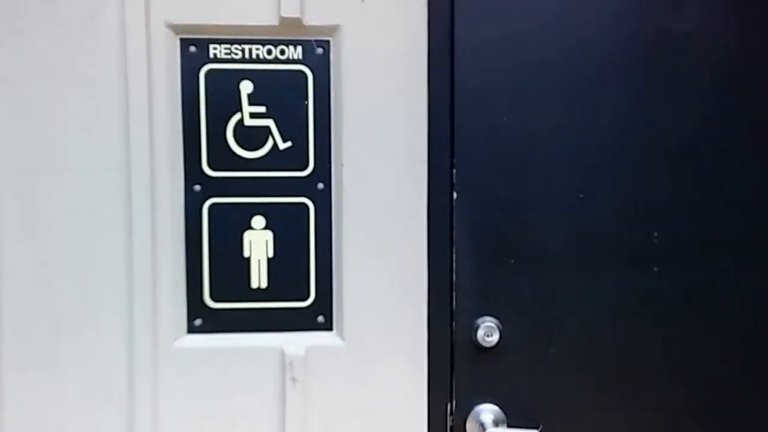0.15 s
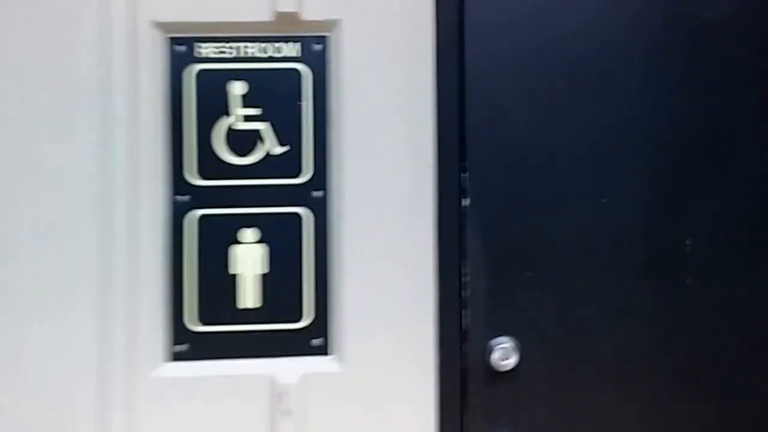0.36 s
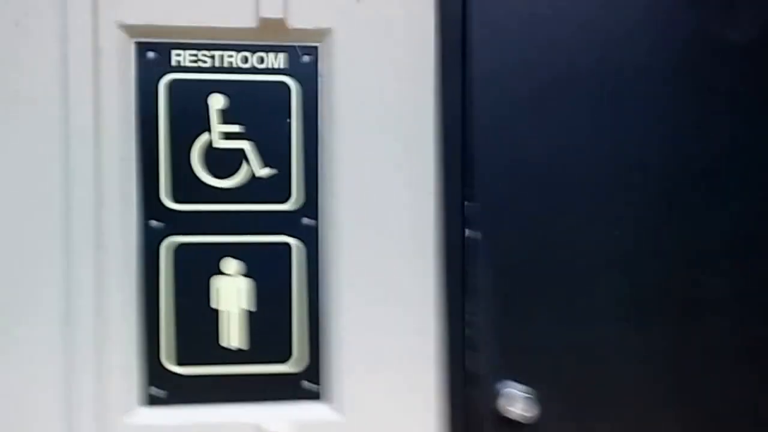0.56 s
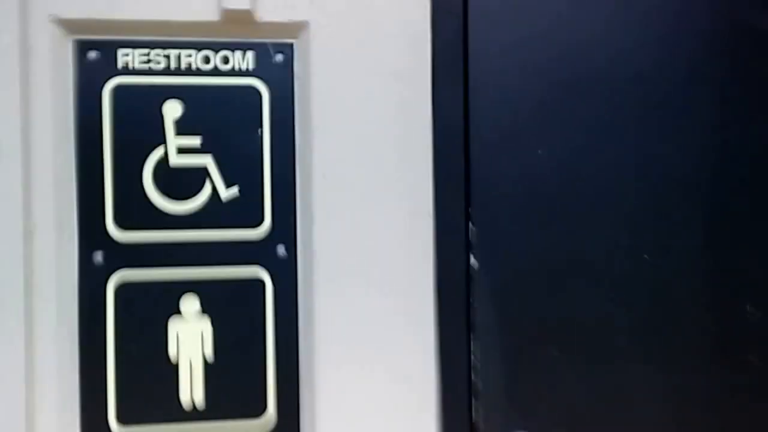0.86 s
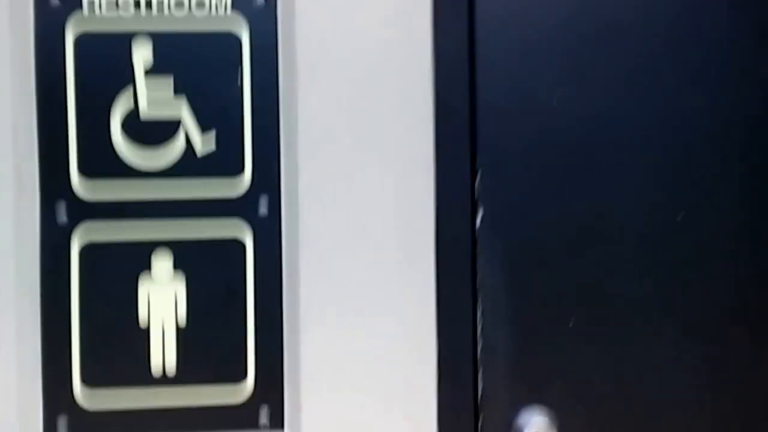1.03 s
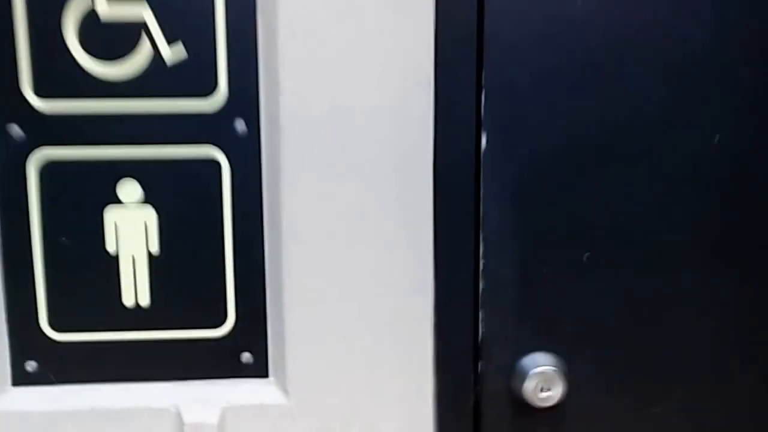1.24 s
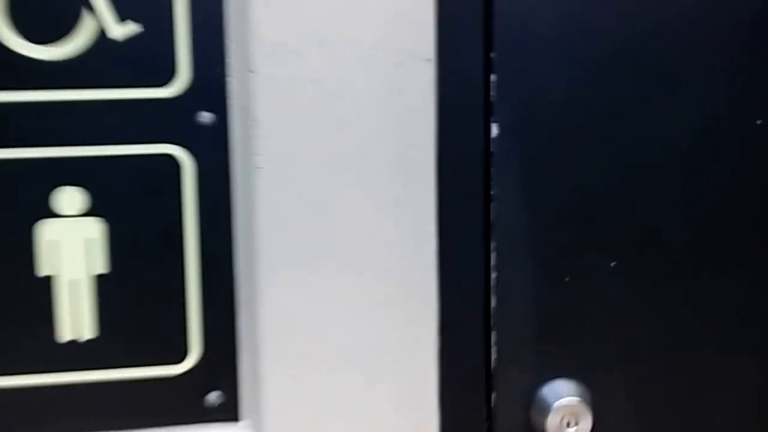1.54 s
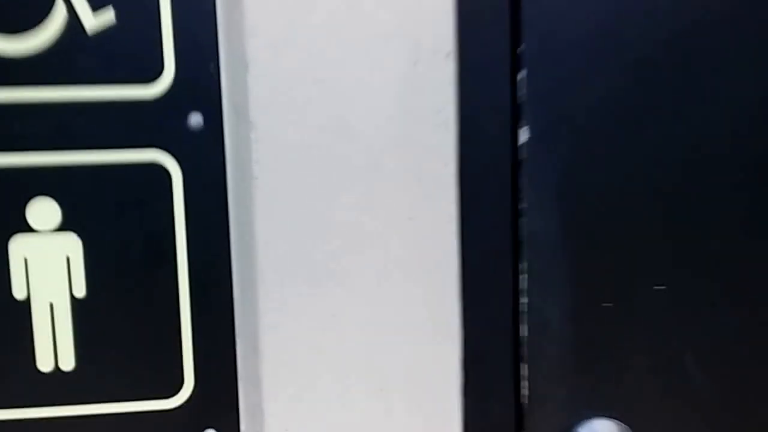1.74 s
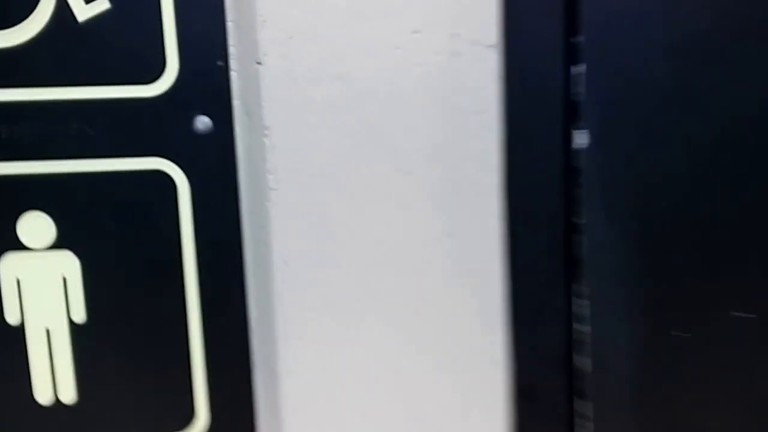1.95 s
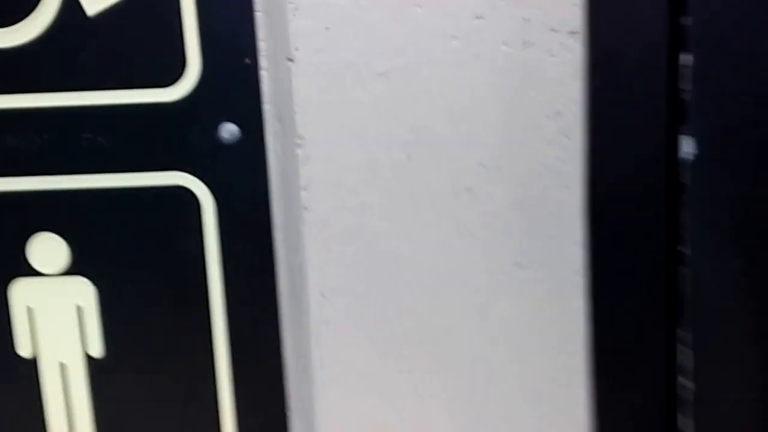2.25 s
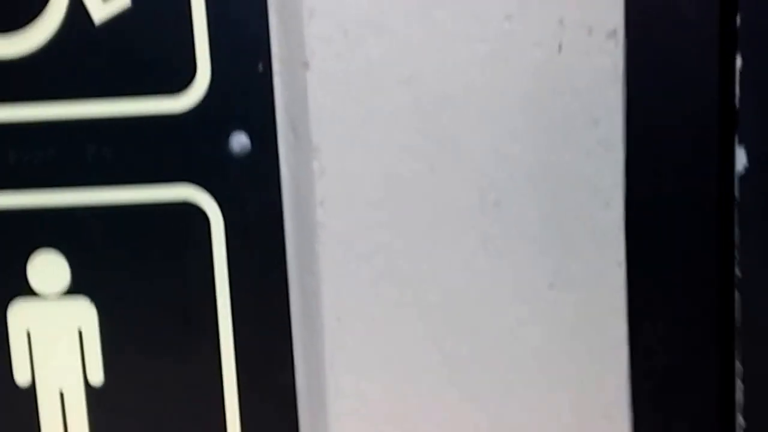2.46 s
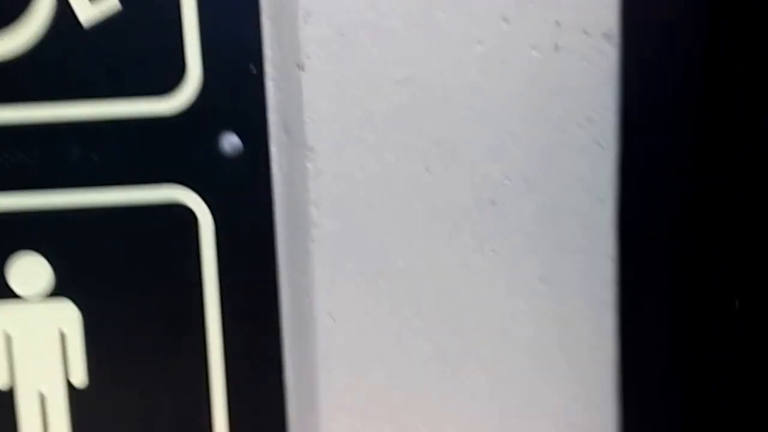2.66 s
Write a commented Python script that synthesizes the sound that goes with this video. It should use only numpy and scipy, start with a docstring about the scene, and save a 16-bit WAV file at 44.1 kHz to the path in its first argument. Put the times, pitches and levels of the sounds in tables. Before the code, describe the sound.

A door latch snaps hard near the end, close to the microphone, with a metallic ring and low door boom; before it, soft scuffs, small ticks and rubbing over a low wavering motor hum in a hard-walled passage.

```python
"""A motor drone and a soft scuff come first; someone walks up to a steel door in a concrete passage.
The drone is a stack of partials that swell and fade as the listener moves among the walls.
Soles and cloth scuff as grainy hiss, the lever's works rub as narrow noise, small parts tick as short rings.
Then the lock snaps: a burst of clicks rings the bolt, lever and steel skin, and the door leaf booms.
Air noise, rumble and low thuds lie beneath, and the walls add a diffuse tail to hand and latch."""
import sys
import numpy as np
from scipy import signal
from scipy.fft import rfft, irfft
from scipy.io import wavfile

SR = 44100
rng = np.random.default_rng(int(sys.argv[2]) if len(sys.argv) > 2 else 0)


def ratio_of_db(decibels):
    """Turn decibels (scalar or array-like) into linear amplitude factors; 0 dB maps to 1."""
    return 10 ** (np.asarray(decibels, float) / 20)


def log_audio(samples):
    """Write samples as a 16-bit WAV file to the path given in sys.argv[1]."""
    # one column per channel
    frames = np.atleast_2d(samples).T
    # limit to full scale, then quantise
    limited = np.clip(frames, -1, 1)
    pcm = np.round(limited * 32767).astype(np.int16)
    wavfile.write(sys.argv[1], SR, pcm)


N = 123479   # length in samples


def rms_one(x):
    """Scales a signal to rms 1."""
    return x / np.sqrt(np.mean(x ** 2) + 1e-20)


def in_time(rows):
    """Joins the rows of a timed table by straight lines, one curve per column after the time."""
    start_s, *columns = np.transpose(rows)
    return [np.interp(np.arange(N) / SR, start_s, column) for column in columns]


def at_hz(points, hz):
    """Reads a (frequency, value) curve on a logarithmic frequency axis."""
    points = np.array(points)
    return np.interp(np.log(hz), np.log(points[:, 0]), points[:, 1])


def drift(rate_hz):
    """Random wander of rms 1: noise through two equal poles at rate_hz, made at SR / 40."""
    r = np.exp(-80 * np.pi * rate_hz / SR)
    noise = rng.standard_normal(N // 40 + 2002)
    slow = signal.lfilter([1], [1, -2 * r, r * r], noise)[2000:]   # skip the filter's start
    return np.interp(np.arange(N) / 40, np.arange(len(slow)), rms_one(slow))


def band(x, low_hz, high_hz):
    """Band-passes a signal."""
    return signal.sosfilt(signal.butter(2, [low_hz, high_hz], "band", fs=SR, output="sos"), x)


# Third-octave band edges [Hz]
EDGES_HZ = 28 * 2 ** np.arange(0, 9.4, 1 / 3)


def bands(size, spectrum):
    """Third-octave bands of noise of a given spectrum, with their centres; neighbours are independent."""
    padded = size + 4000   # the extra start lets the band filters settle
    white = rng.standard_normal((2, padded))
    gain = ratio_of_db(at_hz(spectrum, np.fft.rfftfreq(padded, 1 / SR) + 1))
    shaped = irfft(rfft(white) * gain, padded)
    out = []
    for k, (low_hz, high_hz) in enumerate(zip(EDGES_HZ, EDGES_HZ[1:])):
        out.append((np.sqrt(low_hz * high_hz), band(shaped[k % 2], low_hz, high_hz)[4000:]))
    return out


def coloured(spectrum, flicker_db):
    """Noise of a given spectrum whose bands flicker independently; rms 1."""
    low_hz, high_hz = spectrum[0][0], spectrum[-1][0]
    return rms_one(sum(ratio_of_db(flicker_db * drift(8.3)) * noise
                       for hz, noise in bands(N, spectrum) if low_hz < hz < high_hz))


def dying(spectrum, t60_curve, rise_s):
    """Half a second of noise that swells in, then dies band by band; energy 1."""
    t = np.arange(SR // 2) / SR
    tail = sum(noise * ratio_of_db(-60 * t / at_hz(t60_curve, hz)) for hz, noise in bands(len(t), spectrum))
    tail = tail * np.clip(t / rise_s, 0, 1)
    return tail / np.sqrt(np.sum(tail ** 2))


def whistle(hz, width_hz):
    """Noise twice through one resonance, each pass width_hz wide; rms 1."""
    r = np.exp(-np.pi * width_hz / SR)
    poles = [1, -2 * r * np.cos(2 * np.pi * hz / SR), r * r]
    once = signal.lfilter([1, 0, -1], poles, rng.standard_normal(N))
    return rms_one(signal.lfilter([1, 0, -1], poles, once))


def ring(clicks, modes):
    """Clicks set decaying sines ringing, signs alternating from mode to mode."""
    out = 0
    for k, (hz, db, t60_s) in enumerate(modes):
        r, w = ratio_of_db(-60 / (t60_s * SR)), 2 * np.pi * hz / SR
        strike = (-1) ** k * ratio_of_db(db) * np.sin(w)
        out = out + signal.lfilter([0, strike], [1, -2 * r * np.cos(w), r * r], clicks + 1e-18)
    return out


def stroke(start_s, length_s):
    """Quick rise, slightly sagging hold, exponential release; longer strokes swell and fade more slowly."""
    t = np.arange(N) / SR - start_s
    rise = np.clip(t / (0.0014 + 0.1 * length_s), 0, 1)
    release = np.maximum(t - length_s, 0) / (0.016 + 0.19 * length_s)
    sag = 0.054 * np.clip(t / length_s, 0, 1)
    return rise * np.exp(-release - sag)


# Touches of the bolt: after_s [s after the snap starts], level_db [dB relative to the snap]
LATCH_TOUCHES = [(0, -37), (.0006, 2), (.0012, 0), (.0018, -3.5), (.0045, -6), (0.0122, -7.5)]


def latch_clicks():
    """The bolt strikes and bounces: one single-sample click per touch."""
    snap_s, snap_db = 2.5331, -6.5
    clicks = np.zeros(N)
    for after_s, level_db in LATCH_TOUCHES:
        clicks[int((snap_s + after_s) * SR)] = ratio_of_db(snap_db + level_db)
    return clicks


# Ringing modes of the bolt: pitch_hz [Hz], level_db [dB, relative], t60_s [s]
BOLT_MODES = [(1416, -26.5, 0.046), (2860, -5.5, 0.017), (4970, 1.5, 0.0043), (6190, -4, 0.012),
              (7360, -15, 0.021), (9600, -18, 0.003)]
# Ringing modes of the lever: pitch_hz [Hz], level_db [dB, relative], t60_s [s]
LEVER_MODES = [(709, 17, 0.049), (1207, 6.5, 0.05), (1442, -18, 0.24), (2547, 5, 0.078), (2907, 2.5, 0.25),
               (4840, -6, 0.1), (5400, -8, 0.2)]
# Where the lock radiates little: pitch_hz [Hz], width_hz [Hz]
LOCK_DIPS = [(3500, 310), (4380, 440)]


def lock(clicks):
    """Bolt and lever ring from the same clicks; notches thin out what the lock radiates little of."""
    metal = ring(clicks, BOLT_MODES) + ratio_of_db(-31) * ring(clicks, LEVER_MODES)
    for hz, width_hz in LOCK_DIPS:
        metal = signal.lfilter(*signal.iirnotch(hz, hz / width_hz, fs=SR), metal)
    return metal


# Hiss spectrum of the steel skin: pitch_hz [Hz], level_db [dB per Hz, relative]
SKIN_SPECTRUM = [(700, -27), (1150, -3), (1500, -9), (1900, -10), (2400, 0), (2900, 0), (3500, -14),
                 (3950, 0), (4400, -8), (4950, -3), (5400, 3), (7200, -6), (10500, -11.5), (15600, -36)]
# Decay of that hiss: pitch_hz [Hz], t60_s [s]
SKIN_DECAY = [(800, 0.22), (2900, 0.26), (5300, 0.16), (8000, 0.12), (11000, 0.066)]


def skin(clicks):
    """The steel skin's countless modes blur into a dying hiss, set off by the strongest click."""
    strongest = clicks * (clicks == clicks.max())
    hiss = dying([(100, -90), *SKIN_SPECTRUM], SKIN_DECAY, rise_s=0.00154)
    return ratio_of_db(6) * signal.fftconvolve(strongest, hiss)[:N]


# Booming modes of the door leaf: pitch_hz [Hz], level_db [dB, relative], t60_s [s]
LEAF_MODES = [(64, -24, 0.39), (115.3, -7, 0.43), (193, -11, 0.27), (219.4, -9, 0.62), (277, 0, 0.069),
              (312.8, 0.5, 0.22), (373.3, -3, 0.21), (412, 0.5, 0.41), (473, 7, 0.36)]


def leaf(clicks):
    """The leaf's low modes boom from two softened pushes."""
    second_push_s, soft_hz = 0.01171, 900
    push = clicks + 0.94 * np.roll(clicks, int(second_push_s * SR))
    soft = np.exp(-2 * np.pi * soft_hz / SR)
    softened = signal.lfilter([(1 - soft) ** 2], [1, -2 * soft, soft ** 2], push)
    return ratio_of_db(-23) * ring(softened, LEAF_MODES)


def latch():
    """The bolt snaps and bounces; lever, skin and door leaf ring on."""
    clicks = latch_clicks()
    metal = band(lock(clicks) + skin(clicks), 930, 17000)
    contact_top_hz = 11100   # softens the contact's extreme treble
    metal = signal.sosfilt(signal.butter(2, contact_top_hz, fs=SR, output="sos"), metal)
    return metal + leaf(clicks)


# Scuffs of soles and cloth: start_s [s], length_s [s],
# top_db [dB of the hiss before grain and stroke], body_db [dB of the lower body, likewise]
SCUFFS = [(.0, 0.062, -73.5, -68), (0.227, 0.1, -75, -84), (0.406, 0.0072, -60, -74),
          (0.446, .06, -75.5, -88), (0.941, 0.06, -59.5, -60), (1.0915, 0.018, -60, -58),
          (1.751, 0.008, -62, -61), (2.007, .026, -54, -54), (1.138, 0.14, -77, -65.5),
          (1.536, 0.024, -69, -59.5), (2.065, 0.073, -65.5, -58.5), (2.161, 0.24, -70, -72),
          (2.355, 0.057, -68, -60.5), (2.452, 0.027, -65.5, -53), (2.493, 0.11, -64, -56.5),
          (2.68, 0.099, -66, -61)]
# Scuff hiss: pitch_hz [Hz], level_db [dB per Hz, relative]
SCUFF_TOP = [(4600, -24), (5600, -5), (6500, 2.5), (7800, -3.5), (10000, -12.5), (12000, -18)]
# Lower body of the scuffs: pitch_hz [Hz], level_db [dB per Hz, relative]
SCUFF_BODY = [(400, -22), (700, 6.5), (1100, -1.5), (2300, 0.5), (3100, -2.5), (4000, -8.5), (4700, -30)]


def scuffs(grain):
    """Friction of soles and cloth: grainy hiss and a lower body under each stroke."""
    top = coloured(SCUFF_TOP, flicker_db=1.5)
    body = coloured(SCUFF_BODY, flicker_db=4.5)
    return grain * sum(stroke(start_s, length_s) * (ratio_of_db(top_db) * top + ratio_of_db(body_db) * body)
                       for start_s, length_s, top_db, body_db in SCUFFS)


# Rubbed small parts: start_s [s], length_s [s], pitch_hz [Hz], width_hz [Hz, of one pass],
# level_db [dB before grain and stroke]
RUBS = [(0.99, 0.024, 1750, 140, -54), (0.96, 0.033, 2720, 820, -59.5), (1.21, 0.071, 1446, 180, -55),
        (1.26, 0.13, 1440, 160, -65.5), (1.5, 0.16, 420, 110, -59), (1.811, 0.34, 302, 60.5, -53.5),
        (2.073, 0.11, 2290, 300, -58), (2.075, 0.052, 1320, 270, -56), (2.09, 0.082, 660, 220, -51.5),
        (2.624, 0.082, 373, 180, -47.5)]


def rubs(grain):
    """Rubbing keeps a small part sounding: grainy noise in one resonance under each stroke."""
    return grain * sum(ratio_of_db(level_db) * stroke(start_s, length_s) * whistle(hz, width_hz)
                       for start_s, length_s, hz, width_hz, level_db in RUBS)


# Tapped small parts: start_s [s], pitch_hz [Hz], level_db [dB before the band-pass], t60_s [s]
TICKS = [(.406, 880, -45.5, 0.051), (1.0955, 2250, -36, 0.025), (1.103, 4004, -42.5, 0.034),
         (1.54, 1018, -40, 0.05), (1.752, 728, -37, 0.043), (2.009, 2246, -42, 0.21),
         (2.022, 1710, -41.5, 0.061), (2.022, 299, -32, 0.12), (2.036, 509, -35, 0.073),
         (2.105, 2300, -39.5, 0.051), (2.19, 353, -33, 0.083), (2.405, 2145, -48, 0.057),
         (2.461, 1340, -39.5, 0.056), (2.479, 2625, -40.5, 0.077)]


def ticks():
    """Each tapped part rings once as a single decaying sine."""
    taps = sum(ring(1. * (np.arange(N) == int(start_s * SR)), [mode]) for start_s, *mode in TICKS)
    return band(taps, 276, 3900)


# Crisp contacts of small metal parts: start_s [s], level_db [dB of the click that excites them]
CLICKS = [(.41, -57), (1.0927, -48), (1.096, -47), (1.1118, -49), (2.405, -63), (2.361, -54.5),
          (2.479, -43)]
# Modes those contacts share: pitch_hz [Hz], level_db [dB, relative], t60_s [s]
SMALL_PART_MODES = [(2280, 1.5, 0.035), (3950, -8.5, 0.045), (5880, -3, 0.011), (6990, -3, 0.02)]


def small_contacts():
    """Single-sample contacts ring one shared set of short metal modes."""
    contacts = sum(ratio_of_db(level_db) * (np.arange(N) == int(start_s * SR)) for start_s, level_db in CLICKS)
    return band(ring(contacts, SMALL_PART_MODES), 1200, 8500)


def handling():
    """Feet and hand at work: scuffs and rubs share one fast grain, ticks and contacts ring cleanly."""
    grain = ratio_of_db(3 * drift(185))
    return scuffs(grain) + rubs(grain) + ticks() + small_contacts()


# Middle partials along the walk: start_s [s], level_db [dB rms] of multiples 4, 5, 6, 7, 8, 9
DRONE_MIDDLE = [(0, -60, -51, -47.5, -99, -70, -54.5), (.3, -74, -45, -45, -69, -60, -52),
                (.72, -73, -51, -42, -62, -62, -63.5), (.9, -75, -56, -44, -60, -61, -64.5),
                (1.25, -74, -56.5, -51, -78.5, -56.5, -53.5), (1.6, -71, -59, -59, -82, -66, -60.5),
                (2.1, -62, -57.5, -74, -85, -99, -80), (2.3, -68, -48.5, -54, -79, -84, -76)]
# Low partials along the walk: start_s [s], level_db [dB rms] of multiples 2, 3
DRONE_LOW = [(0, -72, -87), (.9, -69, -78), (2.8, -64, -55)]
# High partials, multiples 10-14: level_db [dB rms, before their wander]
DRONE_HIGH_DB = [-72, -71.5, -73, -76, -68.5]


def motor(turn):
    """Partials of the turning rate swell and fade; those far from multiples 5 and 6 are out of step."""
    levels = [*enumerate(in_time(DRONE_MIDDLE), 4), *enumerate(in_time(DRONE_LOW), 2)]
    levels += [(k, level_db + 4 * drift(2.5)) for k, level_db in enumerate(DRONE_HIGH_DB, 10)]
    spread = 0.197   # radians per multiple squared
    return sum(np.sqrt(2) * ratio_of_db(level_db) * np.cos(k * turn + spread * (k - 5) * (k - 6))
               for k, level_db in levels)


# Background levels: start_s [s], rumble_db [dB, before its wander],
# duct_db [dB, heard only as departure from its mean]
BACKGROUND_LEVELS = [(0.0, -55, -56.5), (0.27, -65, -60), (1.51, -58, -61), (1.6, -60.5, -65),
                     (2.06, -51.5, -63.5), (2.42, -53, -58.5), (2.52, -52, -72), (2.8, -59, -63)]
# Duct resonances: pitch_hz [Hz], width_hz [Hz, of one pass], level_db [dB before swell and throb]
DUCT_PEAKS = [(726, 95, -66), (880, 55, -68), (982, 47, -69), (1459, 68, -74), (2304, 560, -75)]


def duct(turn):
    """Noise in the duct's resonances swells along the walk and throbs with each motor turn."""
    duct_db = in_time(BACKGROUND_LEVELS)[1]
    noise = sum(ratio_of_db(level_db) * whistle(hz, width_hz) for hz, width_hz, level_db in DUCT_PEAKS)
    return noise * ratio_of_db(duct_db - duct_db.mean()) * (1 + 0.2 * np.cos(turn))


def drone():
    """Motor partials and duct noise follow the same turning angle."""
    turn_hz, beat_s = 23.31, 0.017   # turning rate; instant of one beat
    turn = 2 * np.pi * turn_hz * (np.arange(N) / SR - beat_s)
    return motor(turn) + duct(turn)


# Door shifts under the hand: start_s [s], length_s [s], level_db [dB before the stroke]
THUDS = [(2.24, 0.11, -49), (2.37, 0.054, -57), (2.554, 0.052, -38), (2.683, 0.22, -53)]


def thuds():
    """The door shifts under the hand: strokes of deep noise."""
    return rms_one(band(rng.standard_normal(N), 54, 113)) * sum(
        ratio_of_db(level_db) * stroke(start_s, length_s) for start_s, length_s, level_db in THUDS)


# Air noise: pitch_hz [Hz], level_db [dB per Hz, relative]
AIR_SPECTRUM = [(24, -37), (40, -4), (58, -20), (92, -2.5), (127, -0.5), (181, -3.5), (316, -19),
                (427, -18), (981, -12.5), (1230, -17), (1470, -17), (11900, -41.5), (14900, -43),
                (16500, -60)]


def background():
    """Near-steady air noise, a wandering rumble that is strongest near the door, and low thuds."""
    air = ratio_of_db(-56.5) * coloured(AIR_SPECTRUM, flicker_db=0.5)
    rumble_db = in_time(BACKGROUND_LEVELS)[0] + 2.0 * drift(13.5)
    rumble = rms_one(band(rng.standard_normal(N), 274, 511)) * ratio_of_db(rumble_db)
    return air + rumble + thuds()


# Decay of the passage: pitch_hz [Hz], t60_s [s]
PASSAGE_DECAY = [(100, 0.55), (300, 0.59), (1000, 0.87), (3000, 0.63), (5500, 0.44), (7500, 0.45),
                 (11000, 0.52)]


def passage(x):
    """Diffuse tail of the concrete walls: the sound convolved with dying noise."""
    tail = dying([(100, 0.009), (10000, 0)], PASSAGE_DECAY, rise_s=0.0027)
    return ratio_of_db(-9.5) * signal.fftconvolve(x, tail)[:N]


def scene():
    """Mixes all sources; the latch is close, so the walls add less to it."""
    hand, snap = handling(), latch()
    walls = passage(hand + ratio_of_db(-5) * snap)
    return (hand + snap + walls + drone() + background())[None]


def band_limit(x):
    """A steep low-pass at the top of the band."""
    return signal.sosfilt(signal.butter(12, 16930, fs=SR, output="sos"), x)


def record(dry):
    """The microphone drops the deepest bass and adds its hiss."""
    heard = signal.sosfilt(signal.butter(2, 34.6, "high", fs=SR, output="sos"), dry)
    hiss = ratio_of_db(-78) * rng.standard_normal(dry.shape)
    return band_limit(heard + hiss)


dry = scene()
out = record(dry)
log_audio(out)
```